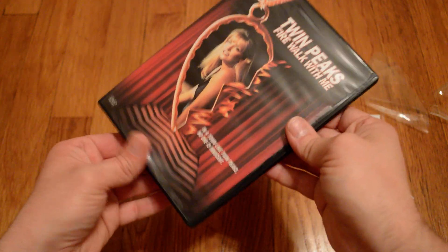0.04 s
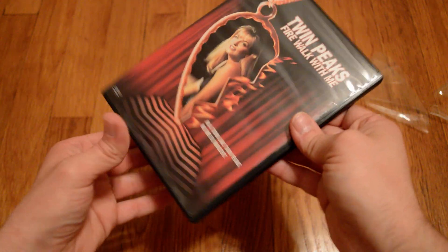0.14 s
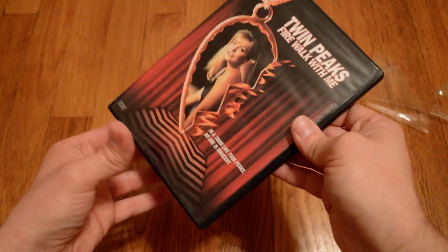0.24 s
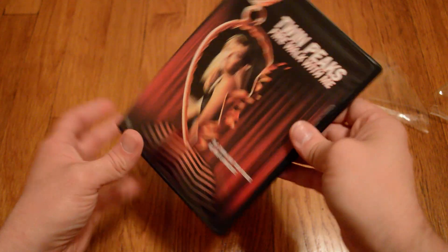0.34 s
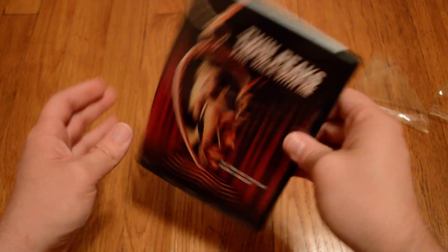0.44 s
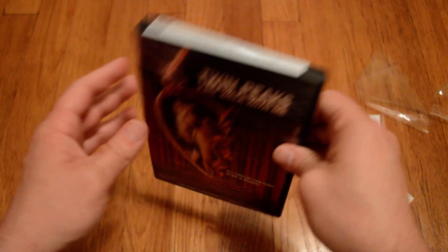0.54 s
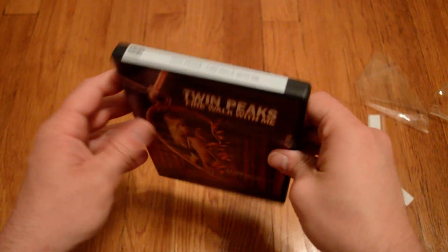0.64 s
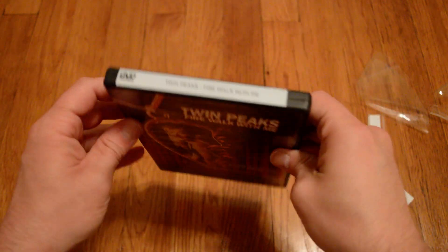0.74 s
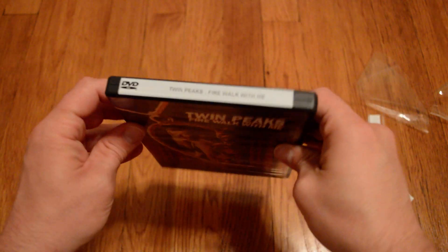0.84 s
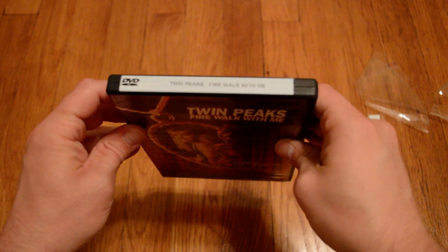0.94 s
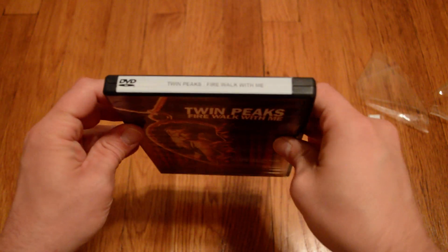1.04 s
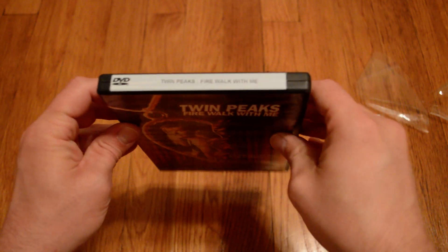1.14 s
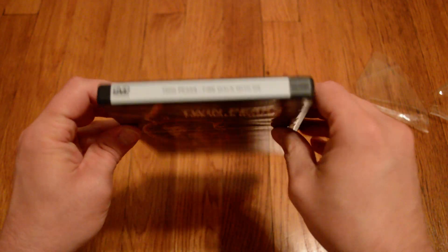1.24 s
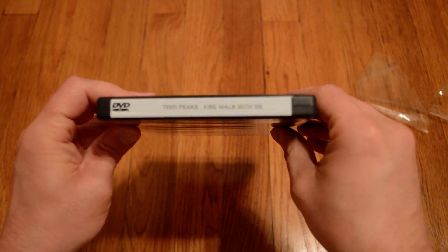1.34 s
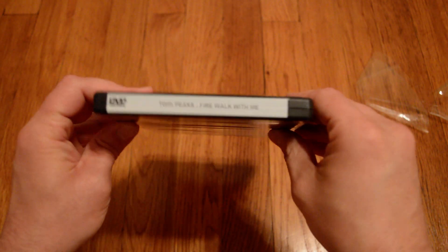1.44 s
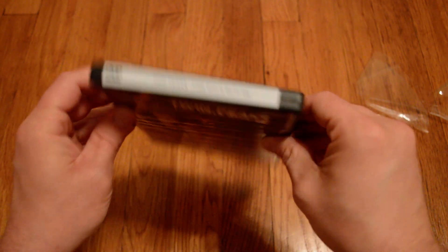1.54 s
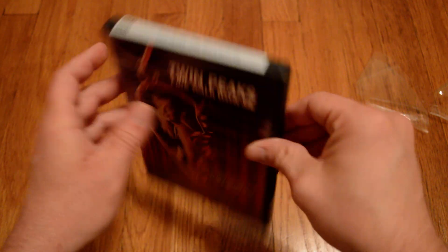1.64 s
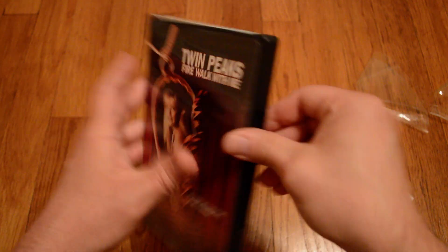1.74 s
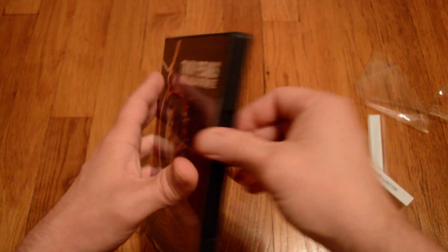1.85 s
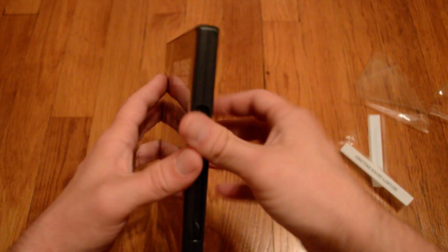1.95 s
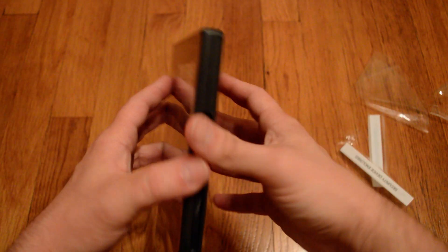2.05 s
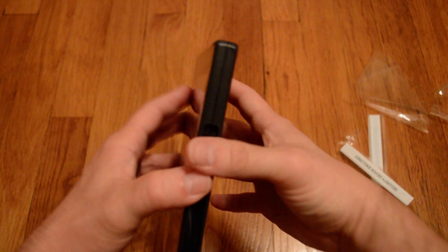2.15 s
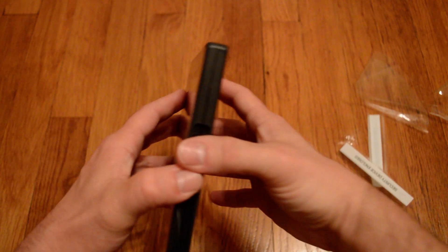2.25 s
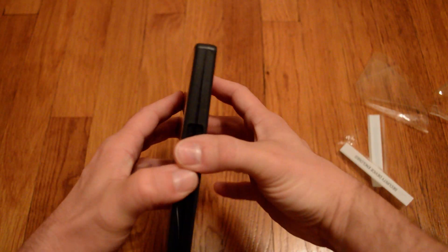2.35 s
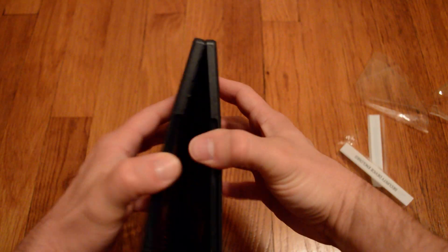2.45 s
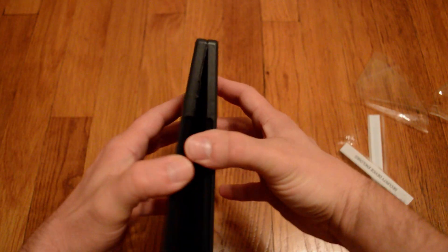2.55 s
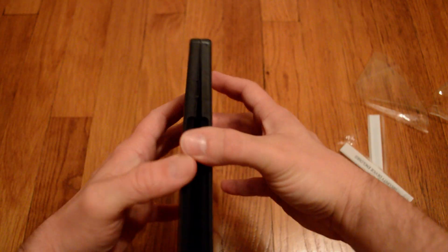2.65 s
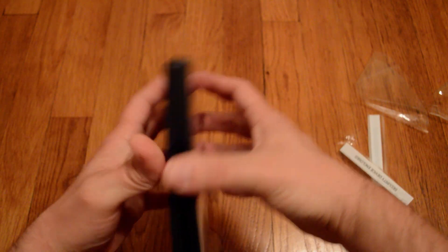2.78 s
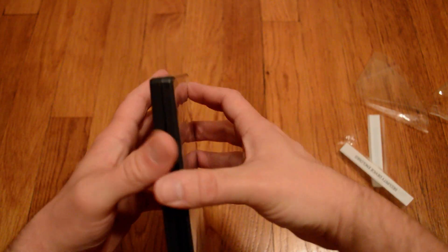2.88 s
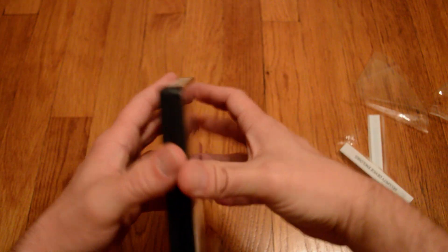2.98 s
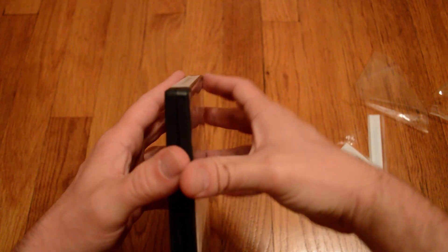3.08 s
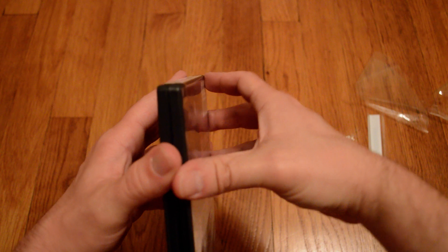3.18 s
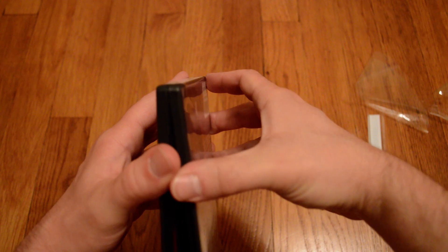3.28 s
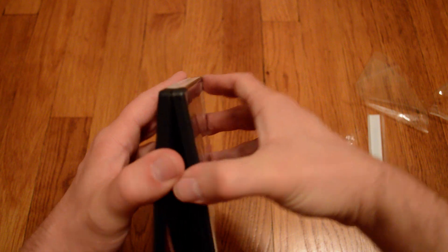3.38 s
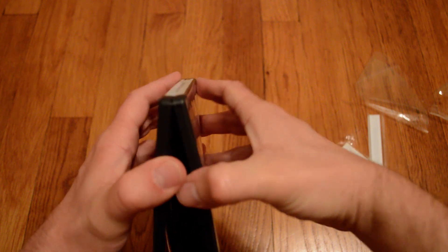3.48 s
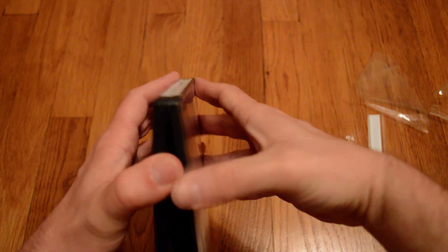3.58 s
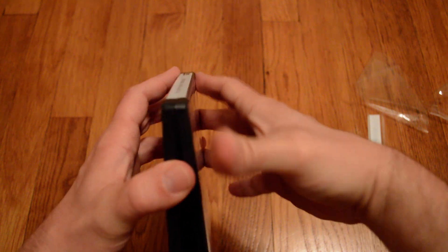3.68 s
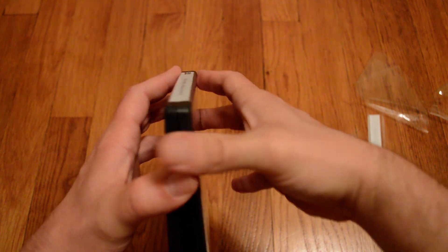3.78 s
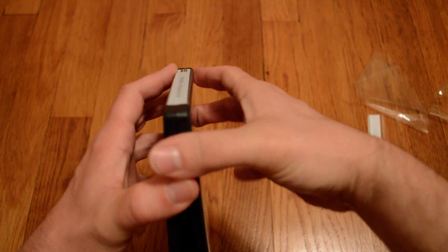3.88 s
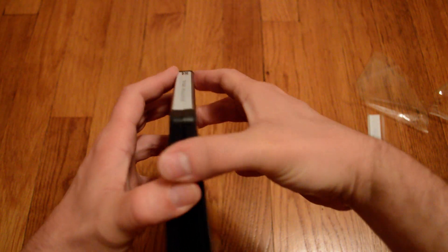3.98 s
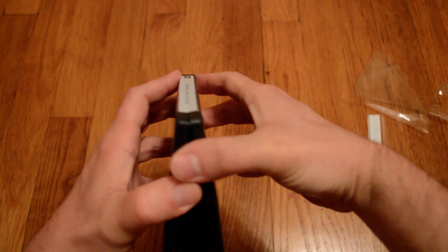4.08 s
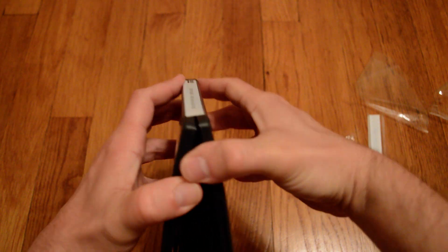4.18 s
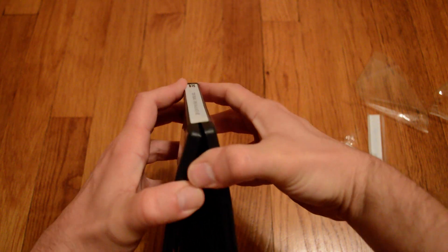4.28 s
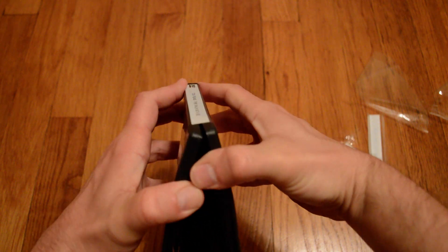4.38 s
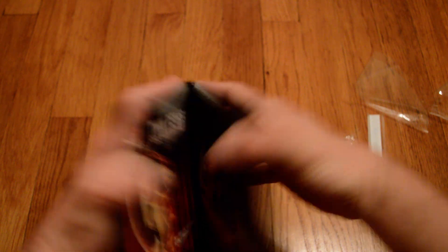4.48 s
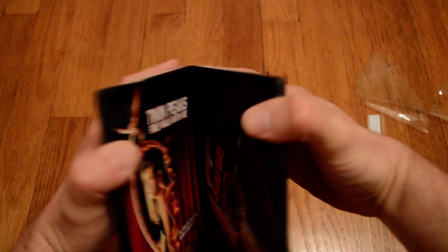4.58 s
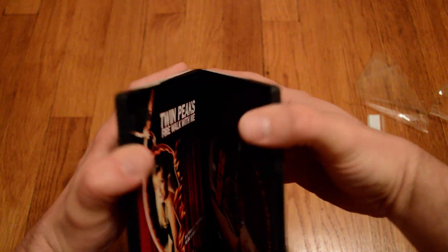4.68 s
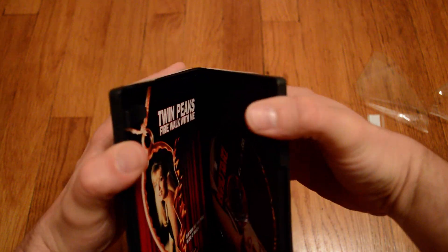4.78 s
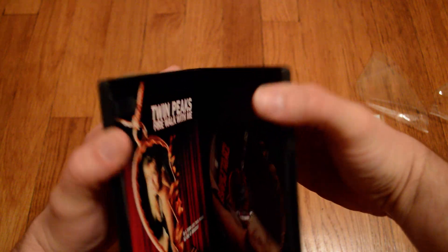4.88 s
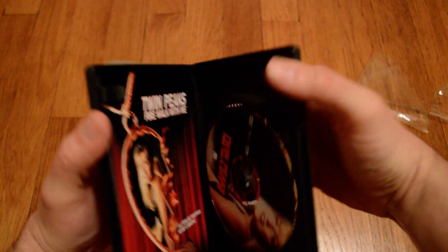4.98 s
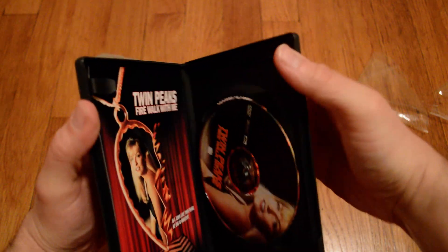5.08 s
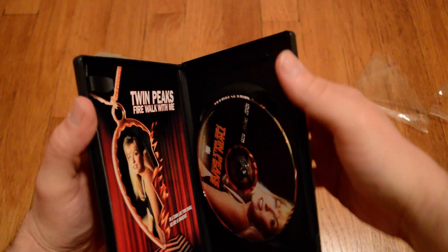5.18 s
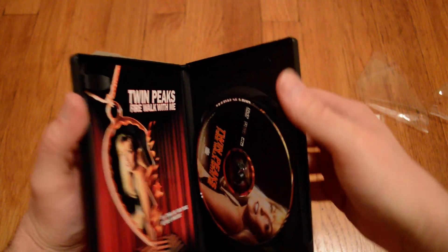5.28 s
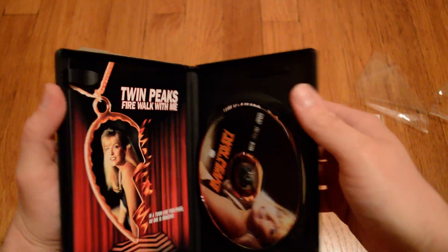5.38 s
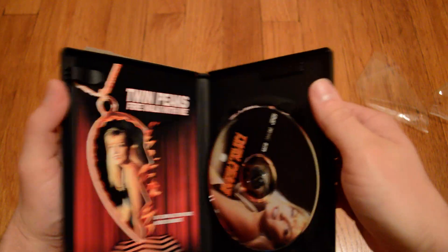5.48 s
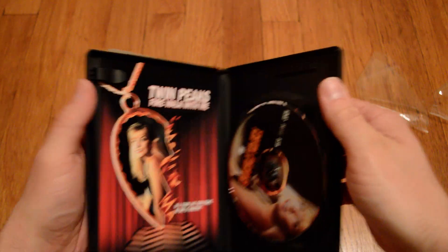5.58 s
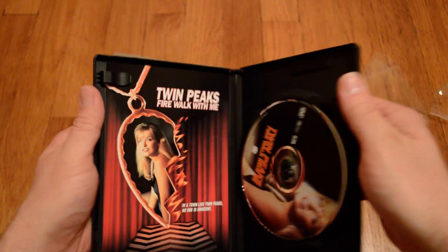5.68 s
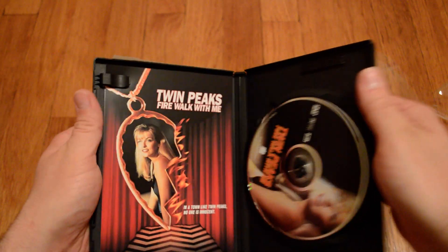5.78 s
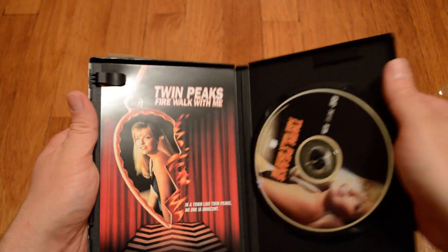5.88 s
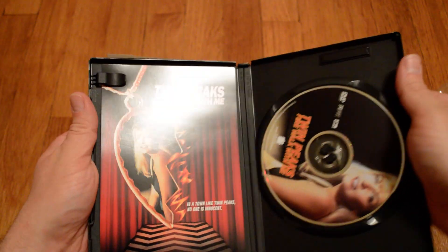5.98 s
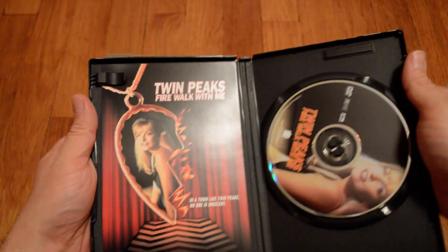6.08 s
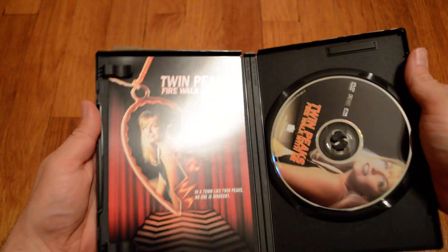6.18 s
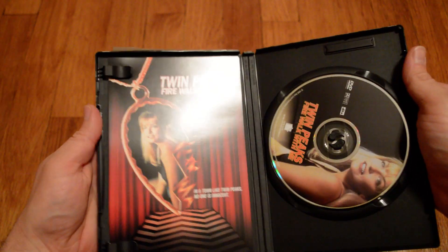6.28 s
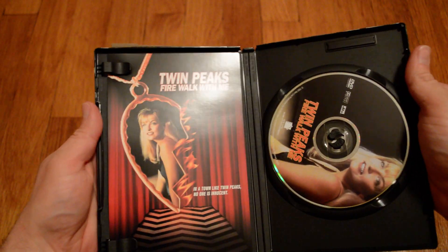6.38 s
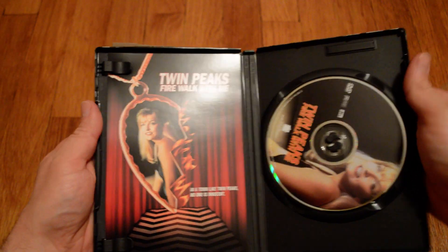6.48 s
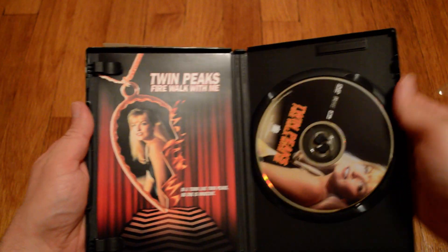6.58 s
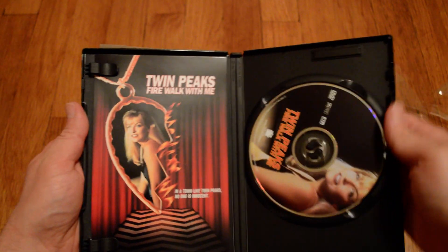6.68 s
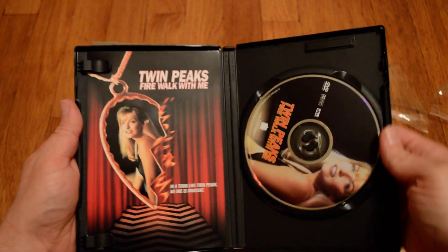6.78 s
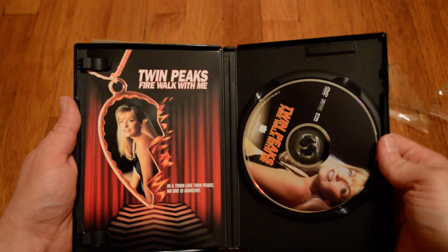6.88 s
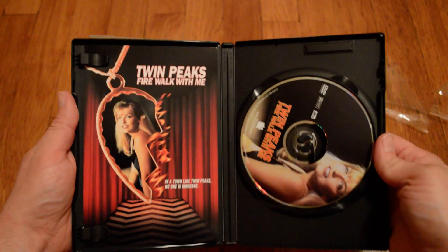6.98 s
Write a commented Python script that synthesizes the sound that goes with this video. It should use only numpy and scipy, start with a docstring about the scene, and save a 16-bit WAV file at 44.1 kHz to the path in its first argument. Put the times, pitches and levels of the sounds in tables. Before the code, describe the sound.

Light plastic clicks and finger rubs, a hard clack midway, then piercing latch snaps as a disc case opens in a bare, echoing room.

```python
"""Disc case, close up in a bare room

A thin plastic disc case is turned, squeezed and pried open in the hands, close to the microphone.
Its latches tick, knock and snap: short bursts of force ring the modes of its parts, and a bare room answers.
Fingers rub the sleeve (swelling, grainy bright noise); a fan hums and hisses below (noise and faint tones).
The loudest snaps overload the recorder, which cuts their peaks flat."""
import sys
import numpy as np
from scipy import signal
from scipy.fft import rfft, irfft, next_fast_len
from scipy.io import wavfile

SR = 44100
rng = np.random.default_rng(int(sys.argv[2]) if len(sys.argv) > 2 else 0)


def wav_record(signal):
    """Record a signal, one row per channel, as 16-bit PCM in the file named by sys.argv[1]."""
    frames = np.transpose(np.atleast_2d(signal))
    bounded = np.clip(frames, -1, 1)
    # unit amplitude maps onto the largest positive 16-bit level
    quanta = np.round(bounded * 32767).astype(np.int16)
    wavfile.write(sys.argv[1], SR, quanta)


N = 310177

# modes of the lid, the spine and the brittle cracking plastic: mode_hz, relative_level_db, t60_s
LID = [(116, -3, 0.034), (199.5, -1, 0.042), (394, 4, 0.027), (526, -4.5, 0.025)]
SPINE = [(1722, 0.5, 0.0073), (2103, -5.5, 0.019), (2290, -2, 0.004)]
CRACK = [(6160, 7, 0.0011), (7650, 7, 0.002), (8530, 6.5, 0.0018), (11450, 3.5, 0.0011),
         (14200, -8.5, .0012)]
# modes of the ribs: ratio to the pitch that the grip leaves free, relative_level_db, t60_s
RIBS = [(.8, 6.5, 0.0016), (1, 0.5, 0.008), (1.25, -6.5, 0.004), (1.57, -2, 0.005)]


def from_db(db):
    """Decibels to gain."""
    return 10 ** (np.asarray(db) / 20)


def rms_one(x):
    """Scale to unit rms."""
    return x / np.sqrt(np.mean(x ** 2) + 1e-20)


def at_hz(points, hz, column=1):
    """Read a table on a log-frequency axis."""
    points = np.array(points)
    return np.interp(np.log(hz), np.log(points[:, 0]), points[:, column])


def coloured(spectrum):
    """Noise with the given spectrum; rms 1."""
    size = next_fast_len(N)
    hz = np.maximum(np.arange(size // 2 + 1) * SR / size, 1)
    white = rfft(rng.standard_normal(size))
    return rms_one(irfft(white * from_db(at_hz(spectrum, hz)), size)[:N])


def drift(rate_hz):
    """Slow chance: noise through a double low-pass at rate_hz; rms 1."""
    r = np.exp(-2 * np.pi * rate_hz / SR)
    noise = rng.standard_normal(N + SR)
    return rms_one(signal.lfilter([1], [1, -2 * r, r * r], noise)[SR:])  # the first second settles


def knocks():
    """Knocks and latch snaps shake the whole shell; rows: time, (modes, pitch scale, dB) list, ms, room dB."""
    # modes of the shell: ratio to the pitch that the grip leaves free, relative_level_db, t60_s
    shell = [(0.799, 0.5, 0.0074), (1.006, 1.5, 0.01813), (1.22, -17, 0.014)]
    # knocks and snaps: start_s, shell_db, rib_db, crack_db, shell_pitch_hz, rib_pitch_hz, length_ms
    knock_list = [(0.0693, -25, -41, -20, 1270, 6170, 1.3), (0.088, -21.5, -15.5, -18.5, 750, 5180, .8),
                  (0.1019, -24.5, -39, -51, 1100, 5790, .8), (0.121, -37, -23, -18, 780, 2680, 1.5),
                  (0.1303, -24.5, -31, -43, 710, 3080, 5.4), (1.19, -42, -62, -53, 740, 3000, 12),
                  (1.8692, -34, -19.5, -59, 797, 3520, 5), (2.176, -44, -37, -39, 1080, 3040, .8),
                  (2.1861, -13.5, -47, -42, 1196, 2720, 4.5), (2.1933, -19, -52, -53, 1170, 2700, 4.9),
                  (2.2129, -29.5, -30.5, -38, 705, 3330, 5.7), (2.243, -30, -37, -43, 945, 3270, 2.3),
                  (2.3926, -4.5, -35, -14, 933, 2880, 3), (2.3967, -5.5, -8.5, -23, 1055, 3130, 2.2),
                  (2.4077, -13.5, -10.5, -16, 1040, 3490, 3.5), (2.4189, -16, -21, -17.5, 964, 4600, 3.1),
                  (2.4248, -18.5, -14.5, -22, 950, 2780, 5), (2.4339, -13, -15, -16.5, 1115, 2550, 3.5),
                  (2.6972, -26.5, -55, -46, 970, 2700, 1.8), (2.709, -27, -44, -35.5, 990, 3360, 3.5),
                  (2.8558, -23, -32, -46, 966, 2860, 3), (3.269, -28, -47, -57.5, 970, 2300, 5.1),
                  (3.2745, -30.5, -46, -56, 1064, 2800, 3.5), (3.297, -31.5, -47, -51.5, 1030, 3900, 7),
                  (3.3704, -40, -40.5, -60, 965, 3300, 4), (3.6192, -16, -24, -32.5, 1000, 2730, 5),
                  (3.6332, -17.5, -17.5, -25, 1330, 2960, 2.5), (3.6484, -16, -20, -26.5, 1003, 3700, 2.5),
                  (3.6721, -25.5, -28, -34, 894, 2720, 3.1), (4.028, -37, -42.5, -50.5, 1010, 3000, 5),
                  (4.0384, -31.5, -31, -42, 912, 2670, 1.5), (4.197, -2.5, 12, 5.5, 1027, 3860, 3),
                  (4.2042, -23.5, 1.5, -26, 1290, 4190, 2.5), (4.426, -21.5, -30, -18, 1090, 2940, 1.8),
                  (4.4344, -19, -20, -11, 1090, 3570, 2), (4.4763, -3, 9.5, 6, 1045, 3088, 1.8),
                  (4.4836, -14, -7.5, 2.5, 1180, 4273, 1.7), (4.489, -7, 3, 11, 1126, 5250, 4.9),
                  (5.438, -40, -69, -67, 848, 2793, 7.8), (5.4911, -33.5, -42, -46, 944, 3947, 1.2),
                  (6.5279, -36, -47.5, -42.5, 1238, 3000, 1.1), (6.538, -34.5, -43, -55, 800, 3020, 1.2)]
    lid_db, room_db = -12, -6  # lid below the shell; room below the direct sound
    lid_loss_when_bright = 0.35  # dB per dB that the bright parts exceed the shell: a snap barely moves the lid
    spine_from_shell, spine_offset_db = 0.63, -1.5  # the spine lies between the shell's level and the bright parts'
    dull_room_loss = 0.64  # dB per dB that the bright parts fall short of the shell: a full grip muffles
    rows = []
    for s, shell_db, rib_db, crack_db, shell_hz, rib_hz, ms in knock_list:
        bright_db = max(rib_db, crack_db) - shell_db
        parts = [
            (LID, 1, shell_db + lid_db - lid_loss_when_bright * max(bright_db, 0)),
            (shell, shell_hz, shell_db),
            (SPINE, 1, shell_db + (1 - spine_from_shell) * bright_db + spine_offset_db),
            (RIBS, rib_hz, rib_db),
            (CRACK, 1, crack_db),
        ]
        rows.append((s, parts, ms, room_db + dull_room_loss * min(bright_db, 0)))
    return rows


def ticks():
    """Light ticks of nails and edges, the shell held still; rows as for the knocks."""
    # ticks: start_s, rib_db, crack_db, rib_pitch_hz
    tick_list = [(0.0547, -48, -34, 5500), (0.0594, -43, -27, 5500), (0.063, -42, -30, 5550),
                 (0.067, -48, -24, 5500), (0.1157, -41, -26, 5500), (0.713, -49, -30.5, 6040),
                 (0.7265, -31.5, -35, 3430), (0.788, -30, -30, 5730), (0.8864, -31, -31, 5940),
                 (0.896, -41, -44, 5900), (1.035, -30.5, -39.5, 4140), (1.2126, -58, -40, 5600),
                 (1.246, -55, -40, 3100), (1.668, -41, -46, 2600), (1.8622, -34, -30.5, 3900),
                 (1.9756, -55.5, -47, 3030), (2.609, -47.5, -36, 3840), (2.7348, -45, -34, 4500),
                 (2.9934, -35, -40, 3560), (4.0848, -38, -37.5, 3320), (4.94, -36, -29, 3076),
                 (4.9808, -32, -39, 3180)]
    length_ms, room_db = 1.2, -6.5
    lid_db, spine_db = -22, -13  # below the tick's louder part
    rows = []
    for s, rib_db, crack_db, rib_hz in tick_list:
        top_db = max(rib_db, crack_db)
        parts = [
            (LID, 1, top_db + lid_db),
            (SPINE, 1, top_db + spine_db),
            (RIBS, rib_hz, rib_db),
            (CRACK, 1, crack_db),
        ]
        rows.append((s, parts, length_ms, room_db))
    return rows


def contacts():
    """Each contact is a click and a ragged burst of force that drives each part; rows: direct, into the room."""
    first_touch = 3.3  # weight of the first instant
    length = 3000  # samples
    out, t = np.zeros((2, N + length)), np.arange(length) / SR
    impulse = (t == 0).astype(float)
    for s, parts, ms, room_db in ticks() + knocks():
        force = rng.standard_normal(length) * np.exp(-(t / (ms / 1000)) ** 2)
        force[0] = first_touch
        start = round(s * SR)
        for modes, scale, peak_db in parts:
            direct = part_sound(force, modes, scale)
            direct *= from_db(peak_db) / np.abs(direct).max()
            # summed over all directions the raggedness averages out:
            # the walls get the plain modes, at a level tied to the direct energy
            plain = rms_one(part_sound(impulse, modes, scale))
            sent = from_db(room_db) * plain * np.std(direct)
            out[:, start:start + length] += [direct, sent]
    return out[:, :N]


def part_sound(force, modes, scale):
    """One part of the case: heavy parts do not follow fast force; neighbouring modes move in opposition."""
    softness = 1.4  # force cut-off over the part's top mode
    top_hz = min(softness * scale * modes[-1][0], .45 * SR)
    felt = signal.lfilter(*signal.butter(2, top_hz, fs=SR), force)
    total = 0
    for k, (hz, db, t60) in enumerate(modes):
        total = total + (-1) ** k * from_db(db) * ring(felt, scale * hz, t60)
    return total


def ring(force, hz, t60):
    """A mode driven by a force: a decaying resonance that radiates nothing static."""
    r, w = from_db(-60 / (t60 * SR)), 2 * np.pi * hz / SR
    return signal.lfilter([.5, 0, -.5], [1, -2 * r * np.cos(w), r * r], force)


def rub():
    """Fingers and latch edges sliding on plastic: bright, grainy, uneven noise; each stroke swells and fades."""
    # rubbing noise: frequency_hz, relative_level_db (per Hz)
    colour = [(1200, -23.5), (2200, -14), (3300, -1.5), (4500, -11.5), (6000, -2.5), (8500, -9.5),
              (12000, -9), (15800, -18)]
    # strokes: peak_s, level_db, fade_s (to -20 dB; negative: a swell this slow, then a quick fade)
    strokes = [(0.083, -30.5, 0.05), (.14, -40, -0.05), (.715, -51.5, 0.77), (.89, -38, 0.0261),
               (.91, -53, -0.08), (1.02, -50, -0.2), (1.228, -73, -0.4), (1.869, -44, 0.22),
               (2.4, -29, 0.0464), (2.425, -35, 0.0255), (3.638, -38.5, 0.02), (3.654, -37.5, 0.04),
               (5.545, -58.5, -0.4), (6.181, -57.5, 0.3)]
    rise_share = 0.13  # rise time over fade time
    t = np.arange(N) / SR
    level = 0
    for s, db, fade_s in strokes:
        distance = np.maximum((t - s) / fade_s, (s - t) / (rise_share * fade_s)).clip(0, 10)
        level = level + from_db(db - 20 * distance)
    grain_db = 3 * drift(90)
    return level * rms_one(coloured(colour) * from_db(grain_db))


def fan():
    """Steady air noise and microphone hiss, one resonance stirred in uneven puffs, and faint wavering tones."""
    # fan air and microphone hiss: frequency_hz, relative_level_db (per Hz)
    air = [(9.4, -62), (16, -25), (59, -14), (91, -11.5), (128, -11), (210, -14.5), (243, -13.5),
           (324, -17), (364, -12.5), (728, -17), (1260, -5.5), (1640, -19.5), (2450, -22.5), (13500, -33.5),
           (16100, -34)]
    # noise in the fan housing's resonance: centre_hz, width_hz, level_db
    whine_hz, width_hz, whine_db = (1268, 150, -47.5)
    # wavering tones: tone_hz, level_db
    hum_tones = [(60, -70), (120, -67.5), (180, -74.5), (240, -63), (299, -67), (15713, -67)]
    air_db, hum_waver_db = -49.5, 1.5
    edges = [whine_hz - width_hz / 2, whine_hz + width_hz / 2]
    band = signal.butter(2, edges, "band", fs=SR, output="sos")
    puffs_db = 4.3 * drift(80) + 1.4 * drift(0.51)
    whine = rms_one(signal.sosfilt(band, rng.standard_normal(N) * from_db(puffs_db)))
    t = np.arange(N) / SR
    hum = 0
    for hz, db in hum_tones:
        level = from_db(db + hum_waver_db * drift(3)) * np.sqrt(2)
        phase = 2 * np.pi * hz * t + 1.9 * drift(0.91)
        hum = hum + level * np.sin(phase)
    return from_db(air_db) * coloured(air) + from_db(whine_db) * whine + hum


def room(x):
    """A diffuse tail that builds up after the first wall and dies band by band."""
    # bare room: frequency_hz, t60_s, relative_level_db
    decay = [(100, 0.31, -3), (291.3, 1, -3.5), (800, 0.5, 3.5), (2160, 0.74, 0.5), (4700, 0.72, 1),
             (9300, 0.58, -8), (15000, 0.42, 1)]
    first_wall_s, build_up_s = .004, 0.00051
    t, tail = np.arange(SR) / SR, 0
    edges = 70 * 2 ** np.arange(0, 8.1, .5)  # half-octave bands, Hz
    for low, high in zip(edges, edges[1:]):
        hz = np.sqrt(low * high)
        band_filter = signal.butter(2, [low, high], "band", fs=SR, output="sos")
        band = signal.sosfilt(band_filter, rng.standard_normal(SR))
        tail = tail + band * from_db(at_hz(decay, hz, column=2) - 60 * t / at_hz(decay, hz))
    tail = tail * (1 - np.exp(-t / build_up_s))
    tail = tail / np.sqrt(np.sum(tail ** 2))  # unit energy
    tail = np.append(np.zeros(round(first_wall_s * SR)), tail)
    return signal.fftconvolve(x, tail)[:N]


def scene():
    """Case and fingers, direct at the microphone and by way of the room, over the fan."""
    rub_room_db = -6
    case = contacts() + from_db([[0], [rub_room_db]]) * rub()
    no_bass = signal.butter(2, 80, "high", fs=SR, output="sos")  # a small case radiates no deep bass
    direct, sent = signal.sosfilt(no_bass, case)
    return (direct + room(sent) + fan())[None]


def record(dry):
    """The recorder cuts peaks flat, then filters off subsonic bass and the top of the spectrum."""
    overload, cutoff_hz = .99, 15850  # overload as a share of full scale
    clipped = np.clip(dry, -overload, overload)
    no_subsonic = signal.lfilter(*signal.butter(1, 30, "high", fs=SR), clipped)
    top_cut = signal.ellip(10, .3, 45, cutoff_hz, fs=SR, output="sos")
    return signal.sosfilt(top_cut, no_subsonic)


dry = scene()
out = record(dry)
wav_record(out)
```